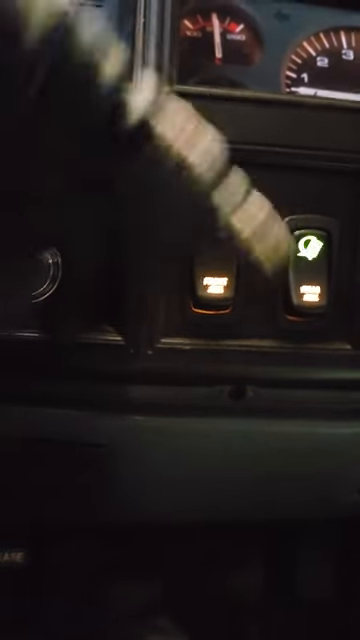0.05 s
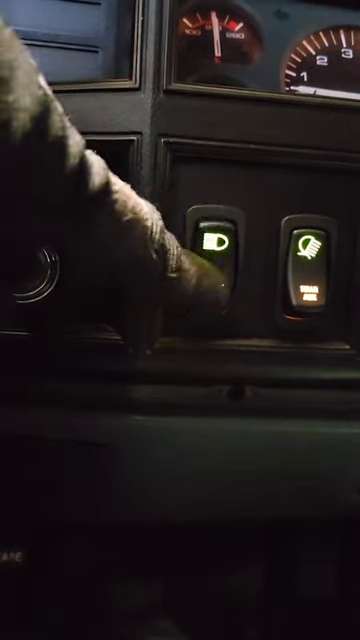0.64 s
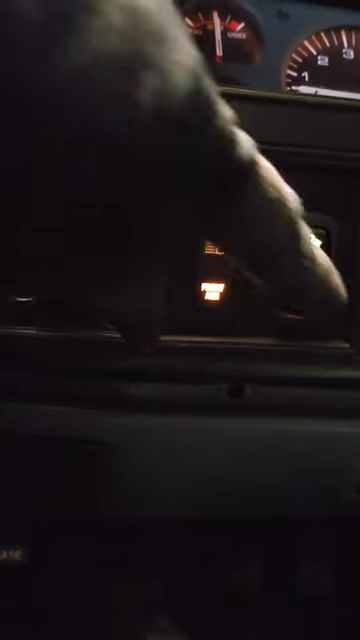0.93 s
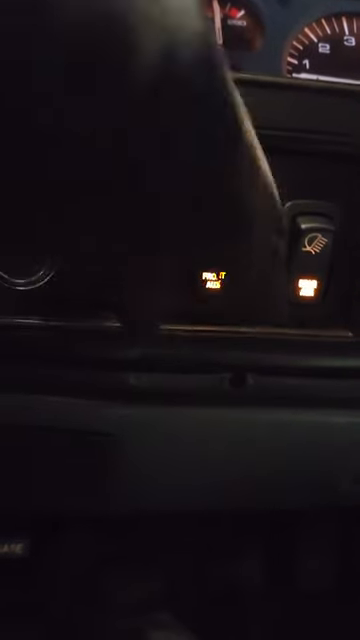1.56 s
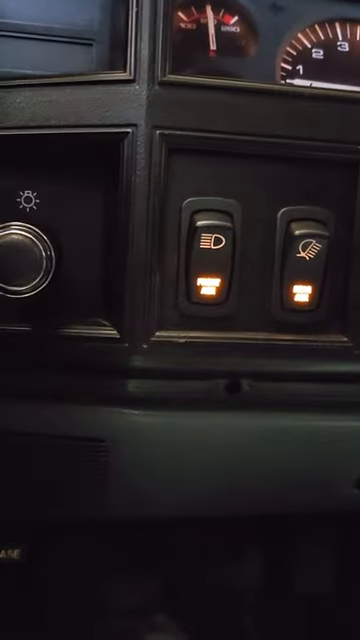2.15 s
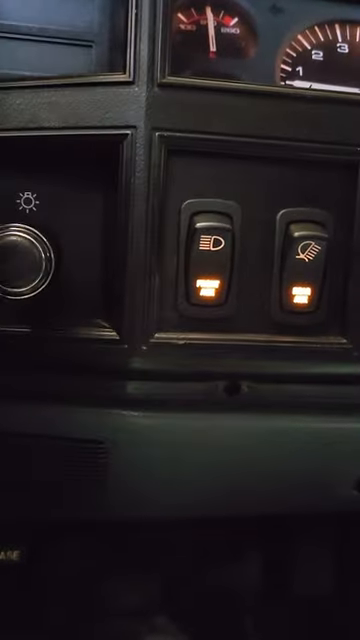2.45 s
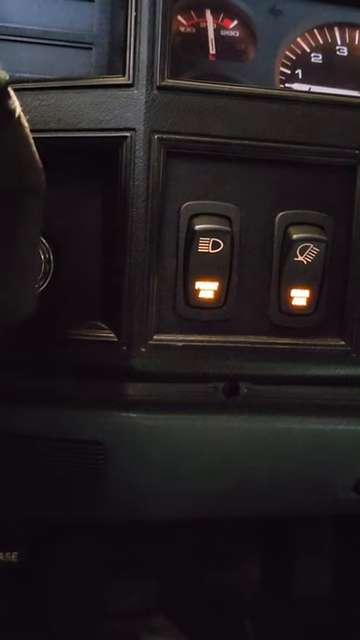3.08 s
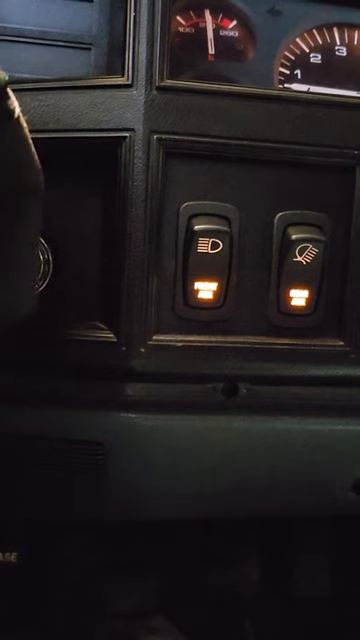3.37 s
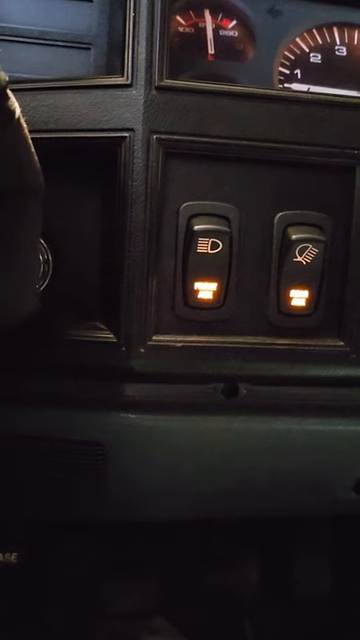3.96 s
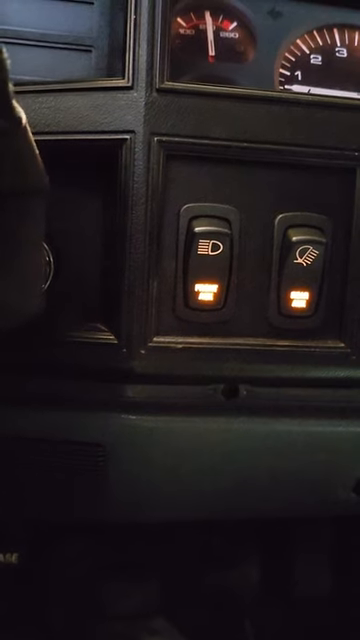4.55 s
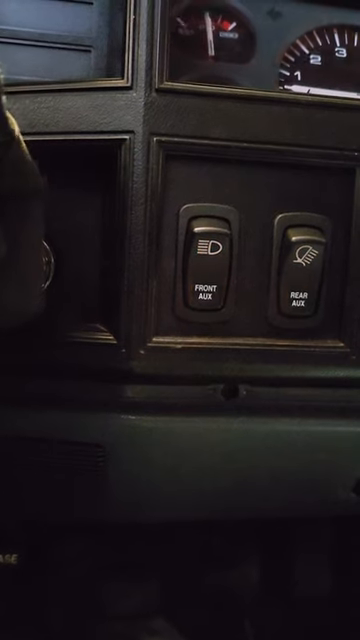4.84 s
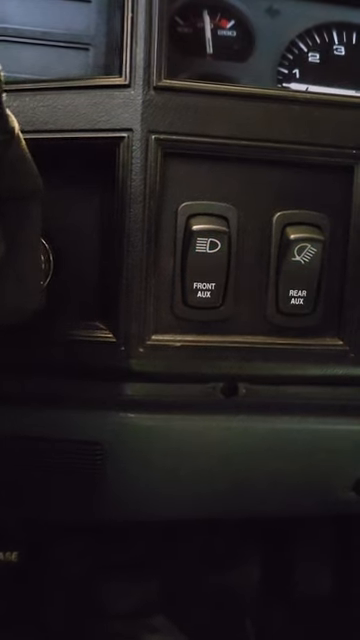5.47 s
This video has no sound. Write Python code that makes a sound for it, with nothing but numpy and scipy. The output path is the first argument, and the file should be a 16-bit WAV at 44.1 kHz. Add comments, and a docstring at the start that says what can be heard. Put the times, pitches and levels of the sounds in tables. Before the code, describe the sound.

Close, sharp clicks of two dashboard switches, soft hand bumps and rustling, and a pushed knob's clack with a faint spring ring.

```python
"""Dashboard switches at night

In a quiet vehicle cabin a finger snaps two plastic rocker switches, close to a phone. The sleeve
rustles as the hand brushes and bumps the panel, finds the headlight knob and pushes it home: a clack,
a ringing spring and a boom of the hollow dash. Under it all lie a low rumble and a faint hiss."""
import sys
import numpy as np
from scipy import signal
from scipy.fft import rfft, irfft, next_fast_len
from scipy.io import wavfile
from scipy.ndimage import map_coordinates

SR = 44100
rng = np.random.default_rng(int(sys.argv[2]) if len(sys.argv) > 2 else 0)


def output_pcm(signal):
    """Save a mono or channel-first signal as 16-bit PCM at the path in sys.argv[1].

    Samples are clipped to [-1, 1] before scaling.
    """
    pcm = np.clip(np.atleast_2d(signal).T, -1, 1) * 32767
    wavfile.write(sys.argv[1], SR, np.round(pcm).astype(np.int16))


N = 247401


def amp(db):
    """Decibels to gain."""
    return 10 ** (np.asarray(db) / 20)


def unit(x):
    """x at rms 1."""
    return x / np.sqrt(np.mean(x ** 2) + 1e-20)


def along(table, hz, column=1):
    """One column of a table over frequency, read on a log axis."""
    columns = np.transpose(table)
    return np.interp(np.log(hz + 1), np.log(columns[0]), columns[column])


def wobble(rate):
    """A smooth random curve, rate knots a second."""
    knots = rng.standard_normal(int(N * rate / SR) + 4)
    return map_coordinates(knots, [np.arange(N) * rate / SR])


def swell(s, half_s):
    """A smooth rise and fall around time s."""
    return np.exp(-np.minimum(((np.arange(N) / SR - s) / half_s) ** 2, 50))


def add(track, s, sound):
    """Mix a sound into the track at time s."""
    part = track[:, round(s * SR):][:, :sound.shape[-1]]
    part += sound[..., :part.shape[-1]]


def filtered(x, response):
    """x shaped by a response of frequency."""
    size = x.shape[-1]
    padded = next_fast_len(size + SR // 4)
    return irfft(rfft(x, padded) * response(np.fft.rfftfreq(padded, 1 / SR)), padded)[..., :size]


def causal(gain):
    """The minimum-phase response with this gain: nothing sounds before the blow."""
    cepstrum = irfft(np.log(np.maximum(gain, 1e-6)))
    half = cepstrum.shape[-1] // 2
    cepstrum[..., 1:half] *= 2
    cepstrum[..., half + 1:] = 0
    return np.exp(rfft(cepstrum))


def evened(spectrum):
    """A stereo spectrum levelled over third octaves, keeping its fine ripple."""
    bins = np.arange(spectrum.shape[-1])
    reach = bins // 8 + 10
    lo, hi = np.maximum(bins - reach, 0), np.minimum(bins + reach, len(bins))
    running_power = np.pad(np.cumsum(np.mean(abs(spectrum) ** 2, axis=0)), (1, 0))
    band_power = np.maximum(running_power[hi] - running_power[lo], 1e-12)
    return spectrum * causal(np.sqrt((hi - lo) / band_power))


# The stereo image. Each row: frequency in Hz, left-right likeness (1 is mono, 0 is wide).
LIKENESS = [(100, 0.95), (250, 0.85), (500, .6), (1000, .1), (3000, 0)]

def stereo_noise(size):
    """White noise at two microphones, alike in the bass."""
    def mid_side_gains(hz):
        angle = np.arccos(np.clip(along(LIKENESS, hz), -1, 1)) / 2
        return np.array([np.cos(angle), np.sin(angle)])
    mid, side = filtered(rng.standard_normal((2, size)), mid_side_gains)
    return np.array([mid + side, mid - side])


def rush(colour):
    """Stereo noise of rms 1, coloured by (Hz, dB) points."""
    return unit(filtered(stereo_noise(N), lambda hz: amp(along(colour, hz))))


# Colours of the rumble and the hiss. Each row: frequency in Hz, relative level in dB.
RUMBLE_COLOUR = [(11, -31), (18, 0.5), (38, -2.5), (81, -3.5), (135, -15.5), (194, -16.5), (316, -29),
                 (343, -27), (500, -38), (650, -61.5), (1100, -120)]
HISS_COLOUR = [(240, -31), (400, -1), (489, -10.5), (562, -2.5), (676, -11.5), (742, -10), (964, -13.5),
               (1110, -10.5), (1760, -9), (2400, -1), (4240, -23), (7510, -20.5), (9040, -34.5),
               (12700, -18.5), (16000, -26)]
# The fader ride on the fizz. Each row: time in seconds, level in dB before the trim.
FIZZ_RIDE = [(0.0, -78), (0.31, -81), (1.85, -75), (2.11, -87), (2.42, -82), (3.94, -94), (4.85, -85),
             (5.19, -94), (5.6, -90)]

def cabin_bed():
    """A gently wavering low rumble, a steady hiss and a narrow high fizz that comes and goes."""
    trim_db = 1.5
    fizz_db = np.interp(np.arange(N) / SR, *np.transpose(FIZZ_RIDE)) + trim_db
    fizz_colour = [(5500, -48), (6700, -12.5), (7400, -.5), (8200, 1.5), (8900, -12.5), (10500, -48.5)]
    fizz = amp(fizz_db) * rush(fizz_colour)
    rumble = amp(-60) * rush(RUMBLE_COLOUR) * amp(1.2 * wobble(2.9))
    hiss = amp(-74.3) * rush(HISS_COLOUR)
    return rumble + hiss + fizz


# Arm moves. Each row: moment of full speed, rise and fall, all in seconds, then strength in dB.
ARM_GESTURES = [(.22, .6, .3, -67.5), (.566, .014, .02, -56.5), (.895, .17, .06, -58.5),
                (1.33, .14, .12, -61.5), (1.62, .12, .12, -56), (1.9, .05, .11, -56),
                (2.455, .06, .04, -58), (2.77, .15, .15, -70), (4.38, .07, .16, -79)]

def arm_rubbing():
    """Each move of the arm gathers speed and dies away; together they give the strength of the rub."""
    t = np.arange(N) / SR
    power = 0
    for s, rise, fall, db in ARM_GESTURES:
        from_peak = np.minimum(abs(t - s) / np.where(t < s, rise, fall), 20)
        power = power + (amp(db) / np.cosh(from_peak)) ** 2
    return np.sqrt(power)


# Colours of cloth and of skin on plastic. Each row: frequency in Hz, relative level in dB.
SLEEVE_COLOUR = [(200, -2), (450, -5.5), (700, -4), (900, -1.5), (1500, 1), (2200, -4), (3400, -11),
                 (5000, -19), (7500, -15), (10000, -27), (15500, -28)]
SKIN_COLOUR = [(1000, -14), (3300, 2), (5000, -5.5), (7500, 0), (10000, -7), (12500, 2), (15500, -4)]
# Strokes over the panel. Each row: middle in seconds, half length in seconds, level in dB.
SKIN_STROKES = [(0.08, 0.07, -71), (.33, .2, -81), (0.794, 0.018, -61.5), (0.904, 0.074, -69.5),
                (1.14, 0.16, -76), (1.63, 0.11, -63), (1.886, 0.018, -52), (1.924, 0.034, -57.5),
                (2.03, 0.055, -68), (2.32, 0.035, -70), (2.47, 0.04, -74)]

def rustle():
    """The sleeve drags with the arm, catching unevenly; skin hisses over the plastic in short strokes."""
    rubbing = arm_rubbing()
    cloth = unit(rush(SLEEVE_COLOUR) * amp(1.8 * wobble(45) + 1.3 * wobble(300)))
    skin = unit(rush(SKIN_COLOUR) * amp(2.2 * wobble(900)))
    graze = amp(-17) * rubbing  # the bare hand brushes along whenever the arm moves
    strokes = sum(amp(db) * swell(s, half_s) for s, half_s, db in SKIN_STROKES)
    return amp(-1.5) * rubbing * cloth + (graze + strokes) * skin


# The cabin's short reverb. Each row: frequency in Hz, time to fall 60 dB in seconds.
CABIN_DECAY = [(60, .65), (100, .55), (200, .33), (400, 0.22), (700, .145), (1400, .09), (3000, 0.067),
               (12000, 0.059)]
# EQ on the reverb send. Each row: frequency in Hz, level over the dry crack in dB before wet_db.
CABIN_SEND = [(100, 12), (400, 6), (900, -0.5), (2000, -5), (5000, -4), (14000, -8.5)]

def blow(body, crack_t60, wet_db, rise_s=0, size=18432):
    """A short crack and the cabin's dense answer, coloured by the struck body."""
    t, hz = np.arange(size) / SR, np.fft.rfftfreq(size, 1 / SR)
    noise = stereo_noise(size)
    attack = np.minimum((t + 1 / SR) / (rise_s + 1 / SR), 1)
    crack = evened(rfft(noise[:, ::-1] * amp(-60 * t / crack_t60) * attack))
    band_hz, frame_s, bands = signal.stft(noise, SR, nperseg=256)
    decay = amp(-60 * frame_s / along(CABIN_DECAY, band_hz)[:, None])
    tail = signal.istft(bands * decay, SR, nperseg=256)[1][:, :size]
    build_up = 1 - np.exp(-(t / .004) ** 2)  # the nearest surfaces answer after a few ms
    reverb = amp(along(CABIN_SEND, hz) + wet_db) * evened(rfft(tail * build_up))
    colour_db = np.array([along(body, hz, column=1), along(body, hz, column=2)])
    return irfft(evened(crack + reverb) * causal(amp(colour_db)))


def housing(modes, size=18432):
    """Plastic rings briefly; each mode has its own strength left and right, the high ones out of step."""
    t = np.arange(size) / SR
    sound = 0
    for (hz, left, right, t60), chance in zip(modes, rng.uniform(-.86, 1, (len(modes), 2, 1))):
        phase = np.pi * chance * (1 - np.clip(along(LIKENESS, hz), 0, 1))
        envelope = amp(np.array([[left], [right]]) - 60 * t / t60)
        sound = sound + envelope * np.sin(2 * np.pi * hz * t + phase)
    return sound * (1 - np.exp(-t / .0003))


def softened(sound, cutoff_hz):
    """A soft contact rolls off the highs."""
    hz = np.fft.rfftfreq(sound.shape[-1], 1 / SR)
    return irfft(rfft(sound) * causal(1 / (1 + (hz / cutoff_hz) ** 4)))


# The panel's dull tone. Each row: frequency in Hz, left and right gain in dB.
PANEL_COLOUR = [(50, 1.5, -3.5), (98, 17, 15.5), (190, 3, 4.5), (252, 3.5, 2), (333, 10.5, 4.5),
                (600, -1.5, -1.5), (796, 7, 1.5), (1020, -5.5, -4.5), (2100, -7.5, -5), (3694, -7.5, -14.5),
                (6050, -12, -20), (9000, -27, -29.5), (15000, -31, -30.5)]
# Its hollow ring. Each row: pitch in Hz, left and right gain in dB, 60 dB decay in seconds.
PANEL_RING = [(95, -6, -6, .55), (306, 0, -2, .1), (355, 0, -3, .12), (450, -17, -13, 0.048),
              (820, -5, -7, .055)]
# The hand's knocks. Each row: start in seconds, force in dB, cutoff in Hz, ring gain in dB.
HAND_BUMPS = [(.604, -12, 2600, -52), (.9, -24, 130, -50), (1.340, -14, 2600, -74.5),
              (1.533, -16, 2400, -59), (1.575, -22, 130, -49), (1.697, -12, 1300, -57),
              (1.7343, 2.5, 9000, -43), (1.853, -10, 1100, -54), (1.895, -20, 130, -45),
              (2.466, -21, 9000, -72), (2.574, -22, 1400, -66), (2.6305, -21, 2200, -58),
              (2.705, -28, 150, -54), (2.9705, -22, 4000, -49), (4.293, -27, 4500, -76)]

def bumps():
    """Finger and knuckles knock softly against the hollow panel."""
    track = np.zeros((2, N))
    for s, force_db, cutoff_hz, ring_db in HAND_BUMPS:
        knock = amp(force_db) * blow(PANEL_COLOUR, crack_t60=.03, wet_db=-3, rise_s=.004)
        add(knock, 0, amp(ring_db) * housing(PANEL_RING))
        add(track, s, softened(knock, cutoff_hz))
    return track


def tilted(sound, tilt_db):
    """Brighten or darken a contact, in dB per octave about 1 kHz."""
    hz = np.fft.rfftfreq(sound.shape[-1], 1 / SR)
    octaves = np.log2(np.clip(hz, 200, 8000) / 1000)
    return irfft(rfft(sound) * causal(amp(tilt_db * octaves)))


def switch(contacts, body, modes, body_db, modes_db, crack_t60, wet_db):
    """A sprung detent slips and slams into its stop; the hardest contact sets the housing ringing."""
    track = np.zeros((2, N))
    for s, force_db, tilt_db in contacts:
        add(track, s, amp(force_db + body_db) * tilted(blow(body, crack_t60, wet_db), tilt_db))
    slam_s = max(contacts, key=lambda row: row[1])[0]
    add(track, slam_s, amp(modes_db) * housing(modes))
    return track


# Each rocker's clicks, from first slip to end stop.
# Each row: start in seconds, force in dB, brightness in dB per octave.
FRONT_CLICKS = [(.6982, -13.5, -0.5), (.7009, -1.5, 0), (.7020, -6.5, 1)]
REAR_CLICKS = [(1.4443, -13.5, 0.87), (1.4467, 0, 0), (1.4478, -8, 0.32)]
# Each rocker's tone in its panel. Each row: frequency in Hz, left and right gain in dB.
FRONT_COLOUR = [(40, -6, -6.5), (100, 17.5, 17.5), (182, 19, 18), (260, 2.5, 4), (375, 15, 12),
                (650, 9.5, 8), (980, 12, 4), (1500, 18, 14.5), (2220, 20, 27), (3400, 16, 9),
                (4600, 8.5, 4), (5600, 10.5, 8), (9500, 1, 2), (12000, 8, 5.5), (15500, 9.5, 4.5)]
REAR_COLOUR = [(40, 0, 0), (100, 10, 12), (180, 21, 21.5), (259, 8, 7), (380, 16, 16), (650, 12, 7),
               (1000, 21, 17.5), (1500, 16, 17.5), (2200, 16, 21.5), (3380, 18.5, 19.5), (4600, 9.5, 5.5),
               (5550, 8, 8), (9600, 2, 3.5), (12200, 4, 7.5), (15500, 3, -1)]
# The housings' ring. Each row: pitch in Hz, left and right gain in dB, 60 dB decay in seconds.
FRONT_RING = [(96, -41, -41, .55), (375, -36, -38, .2), (1500, -21, -22, .06), (1983, -13, -10, 0.02983),
              (2198, -18, -10, .035), (2335, -22, -12.5, 0.06), (2810, -23, -27.5, .05),
              (3130, -21, -23.5, .05), (3950, -17.5, -30.5, 0.044), (5600, -15, -20, .033),
              (7340, -19.5, -31.5, 0.025)]
REAR_RING = [(842, -21, -27, 0.0803), (1041.5, -18.5, -27.5, .07), (1501, -14, -14, .06),
             (2110, -22.5, -16.5, .035), (2240, -25, -13, 0.05), (3110, -20.5, -16, 0.035),
             (3610, -13, -20, .045), (5480, -14.5, -18, .033), (11800, -28, -18.5, .02)]

def rockers():
    """Two rocker switches snap over in turn; a brief, faint swell of noise leads into each snap."""
    front = switch(FRONT_CLICKS, FRONT_COLOUR, FRONT_RING,
                   body_db=-1.2, modes_db=0, crack_t60=.012, wet_db=-1)
    rear = switch(REAR_CLICKS, REAR_COLOUR, REAR_RING,
                  body_db=-1.5, modes_db=-.5, crack_t60=.014, wet_db=-2)
    front_noise = rush([(500, -25), (1900, -6), (2300, 11), (2700, -5), (3700, -5), (6000, -11),
                        (10000, -16), (14000, -8)])
    rear_noise = rush([(400, -20), (1500, 5), (2500, -3), (5500, -7), (10000, -12), (14000, -9)])
    front_swell = amp(-27) * swell(.698, half_s=.01) * front_noise
    rear_swell = amp(-34) * swell(1.444, half_s=.01) * rear_noise
    return front + rear + front_swell + rear_swell


def squeak():
    """The fingertip sticks and slips on the rear switch: a faint, narrow band of noise."""
    pitch_hz, half_width_hz = 1039, 30
    tone = unit(filtered(stereo_noise(N), lambda hz: 1 / (1 + ((hz - pitch_hz) / half_width_hz) ** 2)))
    return amp(-63) * swell(1.33, half_s=.05) * tone


def ring(modes, peak_s, rise_s):
    """Damped sines that swell to full strength at peak_s, then die away."""
    t = np.arange(N) / SR - peak_s
    attack = np.exp(-(np.minimum(t, 0) / rise_s) ** 2)
    age = np.maximum(t, 0)
    return attack * sum(amp(db - 60 * age / t60) * np.sin(2 * np.pi * hz * t) for hz, db, t60 in modes)


# The knob's clicks. Each row: start in seconds, force in dB, brightness in dB per octave.
KNOB_CLICKS = [(4.8398, -19.5, 1), (4.8420, -8.5, 0.84), (4.8457, -3, 0.97), (4.8474, -7.5, -2.3)]
# Its tone in the panel. Each row: frequency in Hz, left and right gain in dB.
KNOB_COLOUR = [(30, 19, 16), (177, 17, 24), (261.6, 21, 16), (369.4, 24, 22.2), (720, 8, 12),
               (1050, 21.6, 20), (1510, 22, 25), (2200, 9.1, 19), (3400, 13, 11), (4600, 12, 8.2),
               (7200, 13, 8), (9200, 2, 2.3), (12000, 17, 14), (15500, 7.8, 4)]
# Its housing's ring. Each row: pitch in Hz, left and right gain in dB, 60 dB decay in seconds.
KNOB_RING = [(363.7, -31.5, -30.5, 0.26), (510, -32, -31, .2), (573, -23, -24, 0.14),
             (1060, -22, -28, 0.054), (1281, -23, -9, 0.04), (1420, -25, -23, .05), (1616, -22, -18, .055),
             (2232, -26, -18, 0.06), (3580, -13, -14, .055), (11300, -22.5, -14, 0.019)]
# The thin ping of its spring, and the boom of the hollow dash and cabin air.
# Each row: pitch in Hz, level in dB, 60 dB decay in seconds.
SPRING_PING = [(1628, -55, .43), (6643, -71, .25), (7225, -70, .35), (8650, -76, .4), (12930, -55, .3)]
DASH_BOOM = [(92.1, -21.5, 0.48), (110.3, -26, 0.38), (69.5, -31, 0.57), (130, -30, .17), (35, -42, .4)]

def headlight_knob():
    """The knob's shaft slides in and clacks home, sets its spring ringing and shakes the whole dash."""
    slide_noise = rush([(300, -19.5), (1200, 5), (2800, -7), (4400, 3), (5500, -6), (7500, -3.5),
                        (9500, -17), (13000, -4)])
    slide = amp(-33) * swell(4.838, half_s=.011) * slide_noise
    clack = switch(KNOB_CLICKS, KNOB_COLOUR, KNOB_RING,
                   body_db=-.5, modes_db=1, crack_t60=.011, wet_db=0)
    end_stop_s = KNOB_CLICKS[-1][0]
    spring = ring(SPRING_PING, peak_s=end_stop_s, rise_s=.001)
    boom = ring(DASH_BOOM, peak_s=4.884, rise_s=.023)
    return slide + clack + spring + boom


def scene():
    """The stereo mix: switches up front, the hand's small noises and the cabin bed beneath."""
    return rockers() + headlight_knob() + bumps() + rustle() + cabin_bed() + squeak()


def record(dry):
    """The phone clips at full scale and cuts off steeply at its band limit."""
    top_hz = 16100
    clipped = np.clip(dry, -1, 1)
    return filtered(clipped, lambda hz: 1 / (1 + (hz / top_hz) ** 120))


dry = scene()
out = record(dry)
output_pcm(out)
```